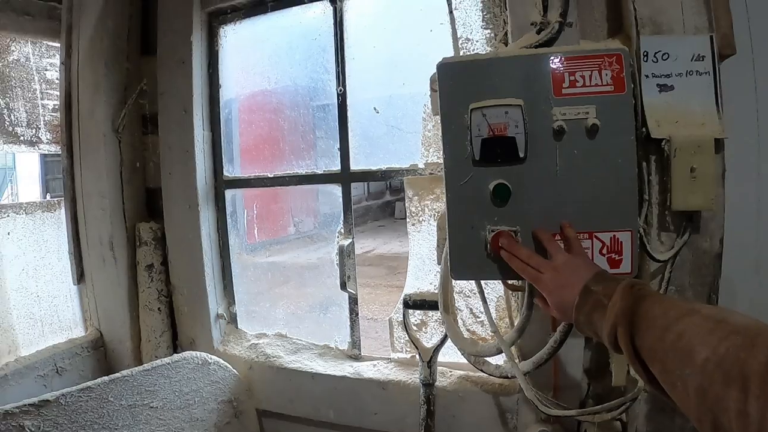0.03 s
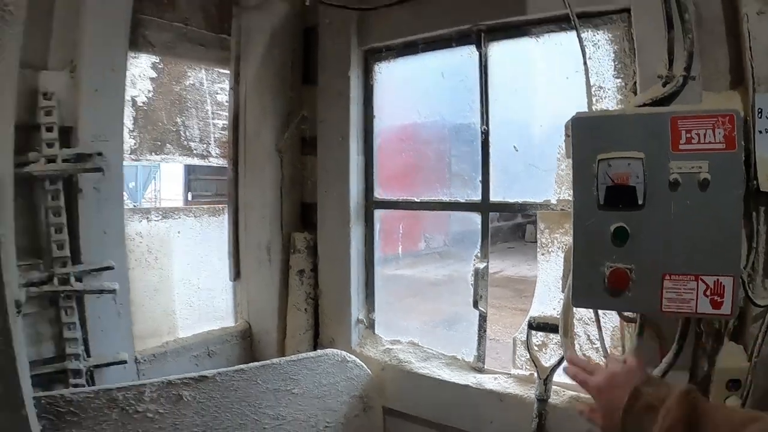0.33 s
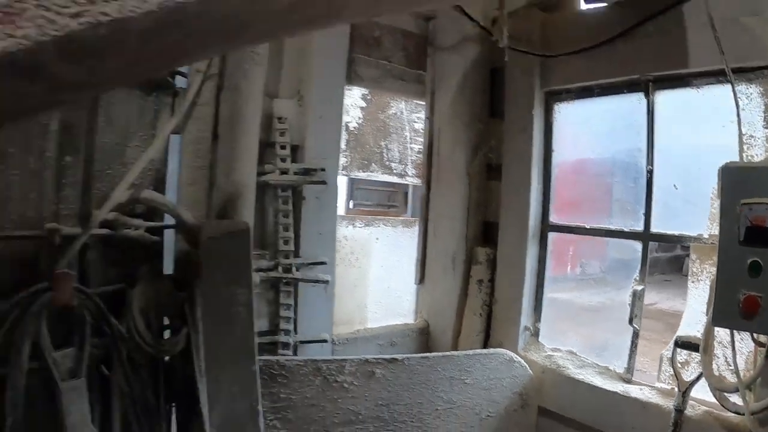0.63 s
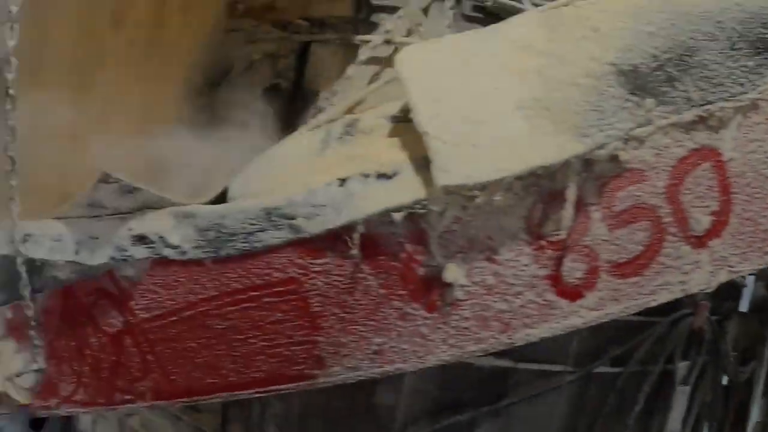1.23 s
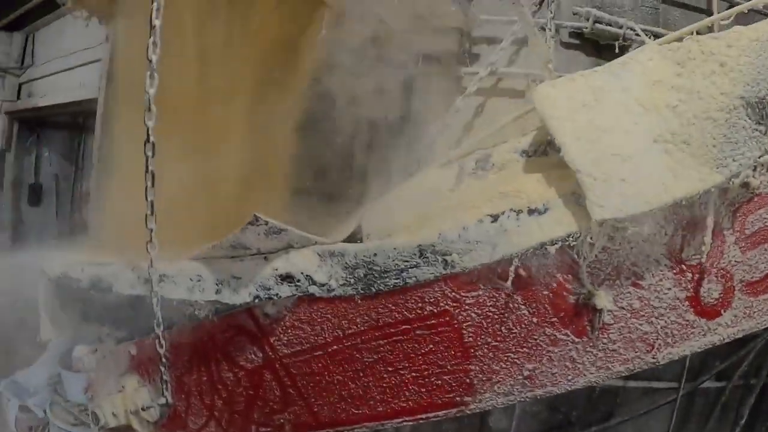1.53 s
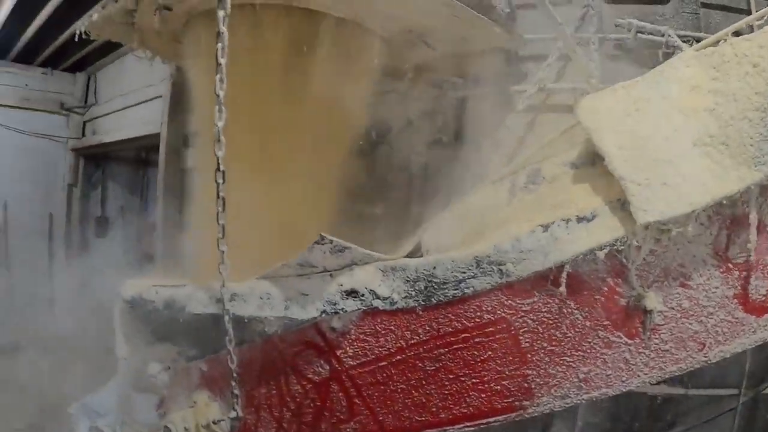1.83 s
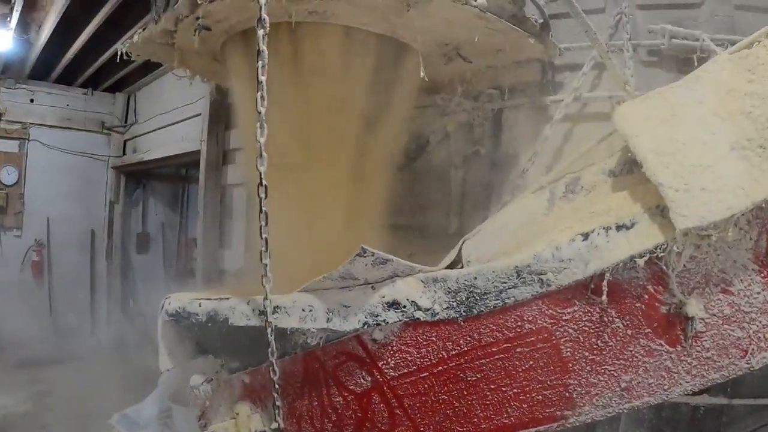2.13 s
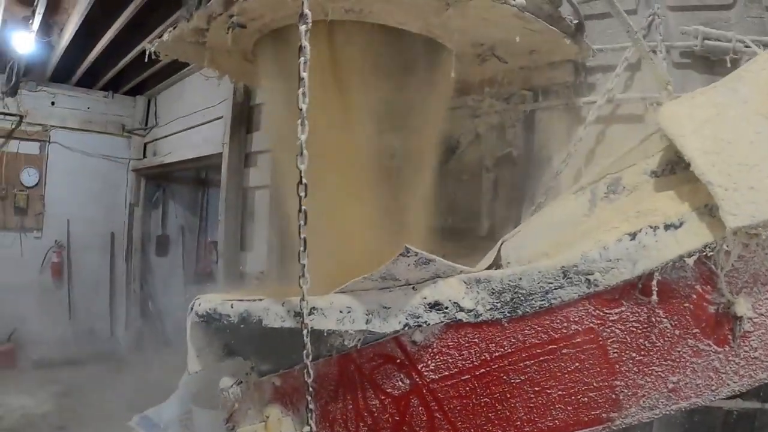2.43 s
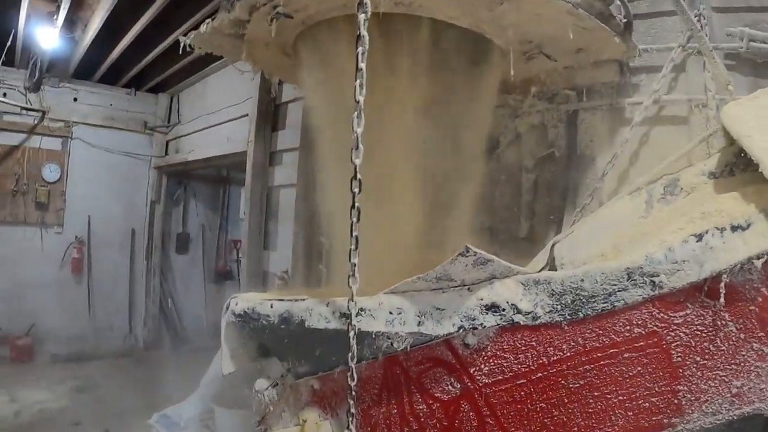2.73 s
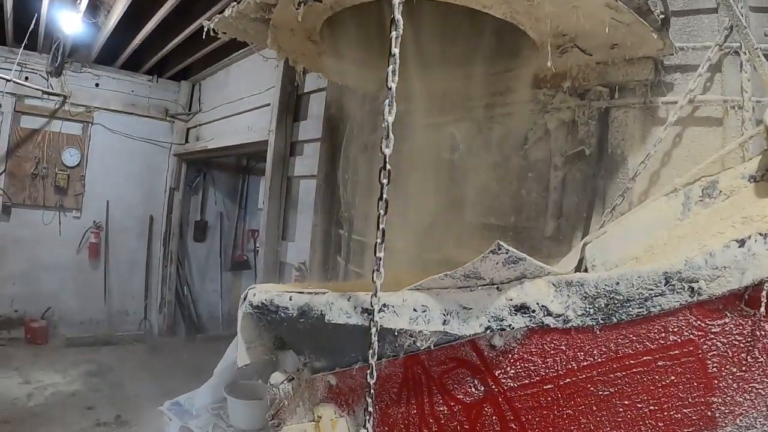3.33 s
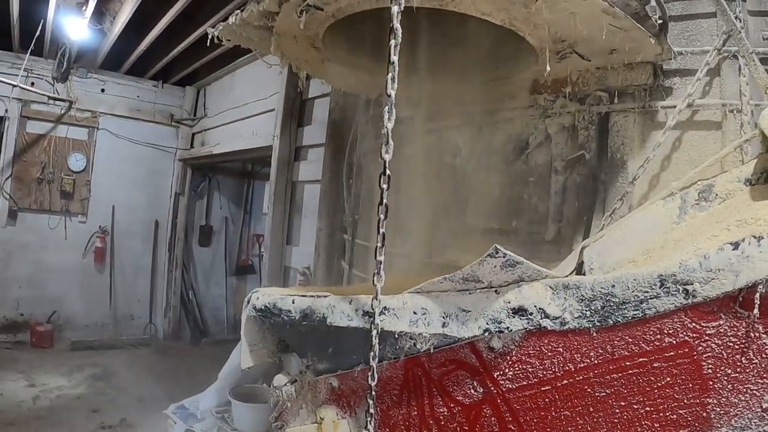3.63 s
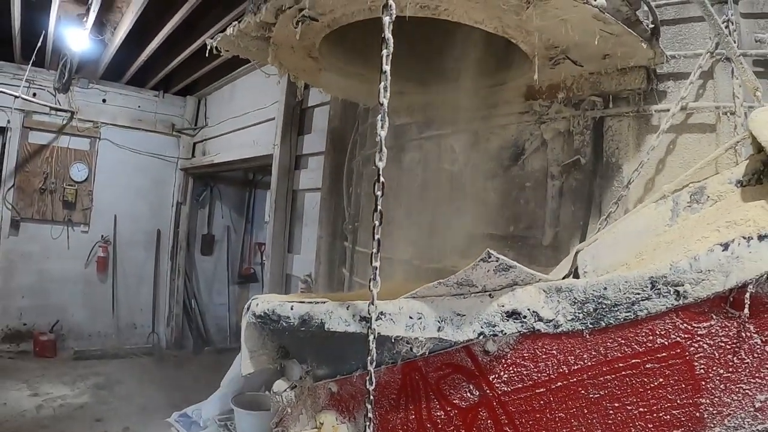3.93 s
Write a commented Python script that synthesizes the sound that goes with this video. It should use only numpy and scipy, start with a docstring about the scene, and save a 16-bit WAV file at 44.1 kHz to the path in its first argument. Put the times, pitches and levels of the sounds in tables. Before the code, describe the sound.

Feed roars down a chute into a mixer in a farm building, with thudding clumps and a hissing pour. A button clicks early. As the microphone turns, close patter and clacks come forward, then the stream thins.

```python
"""A booming roar comes first: feed from a silo unloader tumbles down a chute into a mixer in a farm building.
Clumps thud in the chute, hard bits clack on its wall, and the pouring stream hisses and patters,
thinning out at the end. Early on a button clicks at the control box; the microphone turns
from the box to the open stream on its right, and close ticks and fine spray come forward."""
import sys
import numpy as np
from scipy import signal
from scipy.fft import rfft, irfft, next_fast_len
from scipy.io import wavfile
from scipy.ndimage import map_coordinates

SR = 44100
rng = np.random.default_rng(int(sys.argv[2]) if len(sys.argv) > 2 else 0)


def to_wav(s):
    """Save 16-bit WAV."""
    ch = np.atleast_2d(s).T  # columns
    pcm = np.round(np.clip(ch, -1, 1) * 32767)  # PCM
    wavfile.write(sys.argv[1], SR, pcm.astype(np.int16))


N = 176400

# Fader rides for the chute's roar (t/s, level/dB)
RUMBLE_FADER = [(0.0, -25.5), (1.99, -26), (4.0, -24)]
BOOM_FADER = [(0.0, -19.5), (0.36, -24), (0.52, -18.5), (0.58, -27), (0.7, -25), (0.83, -20.5), (0.93, -27),
              (1.1, -22.5), (2.42, -22.5), (3.25, -25.5), (3.62, -22.5), (4.0, -25.5)]
RUSH_FADER = [(0.0, -30), (0.88, -31.5), (1.5, -30), (2.0, -31), (2.58, -33.5), (3.48, -33), (3.68, -29.5),
              (4.0, -31.5)]
DRONE_FADER = [(0, -27), (1.0, -30.5), (1.8, -24), (2.3, -30), (2.62, -23), (3.3, -24), (4, -21.5)]  # the chute's lowest air resonance
CORNER_FADER = [(0, -28), (.5, -27), (.95, -32.5), (1.4, -39)]  # a boomy spot of the room beside the control box
# EQ of the roar: deep rumble, low boom, midrange rush (f/Hz, level/dB)
RUMBLE_EQ = [(10, -24), (24, -7.5), (33, 1), (44, -4), (56, -6.5), (72, -4.5), (88, -6), (130, 3.5),
             (300, -85)]
BOOM_EQ = [(60, -50), (95, -7.5), (108, 0.5), (140, -8.5), (162, -1), (190, -3.5), (235, -0.5), (300, -6),
           (380, -11.5), (520, -17.5), (1000, -51), (2000, -100)]
RUSH_EQ = [(150, -36.5), (330, 1.5), (440, 3), (570, 1), (740, 0.5), (900, -3.5), (1150, -9.5),
           (1600, -15.5), (2200, -20.5), (4000, -33), (9000, -81)]

# Fader rides for the stream (t/s, level/dB)
POUR_FADER = [(0.0, -39.5), (0.42, -38.5), (0.9, -41.5), (1.12, -44), (1.29, -42), (2.02, -39.5),
              (2.36, -39), (2.61, -44.5), (3.1, -42.5), (3.3, -47), (3.95, -53)]
WASH_FADER = [(0, -44), (.45, -48.5), (.7, -54.5), (1.0, -66.5)]  # patter off the walls, blurred to a smooth hiss
PATTER_FADER = [(1.03, -65.5), (1.075, -43), (1.35, -46.5), (1.65, -46), (2.2, -46), (2.65, -49),
                (3.1, -55), (3.5, -52.5), (4, -65)]  # opens up once the mixer's side no longer screens it
SPRAY_FADER = [(0, -63), (.5, -79), (1.03, -83), (1.08, -60), (1.3, -54.5), (1.6, -49.5), (2.15, -47),
               (2.6, -50.5), (3.0, -51.5), (3.5, -56.5), (4, -62.5)]  # fine spray, heard only in sight of the stream
GRIT_FADER = [(1.05, -62), (1.3, -51.5), (1.9, -40.5), (2.35, -47), (3.0, -49)]  # coarse grit in the thick of the stream
# EQ of the stream: broad pour, crisp patter, airy spray (f/Hz, level/dB)
POUR_EQ = [(500, -7.5), (1300, 2), (2100, 0), (2650, 0), (3200, -1.5), (3900, -1), (5000, -9),
           (6300, -16.5), (7500, -23.5), (8600, -31.5), (10500, -45.5), (15000, -54.5)]
PATTER_EQ = [(2000, -31.5), (3600, 2.5), (4700, 1.5), (6200, 1), (7600, -9), (8600, -24), (10000, -27),
             (14000, -43.5)]
SPRAY_EQ = [(2000, -27), (4500, 3.5), (6200, -5), (7600, -0.5), (8800, -6.5), (10700, -14.5),
            (12300, -13.5), (14000, -20.5), (15700, -29.5)]

# Cues for clumps hitting the chute (t/s, level/dB, brightness/dB, body t60/s)
THUD_CUES = [(0.078, -16, -16, 0.1), (.48, -14, -5.5, 0.084), (.728, -22, 1, 0.28),
             (1.093, -17.5, -12, 0.086), (1.826, -22.5, 0.5, 0.035), (2.11, -24, 8, 0.21),
             (2.17, -22, 2.5, 0.1), (2.512, -20.5, -2, 0.28), (2.739, -25.5, 3.5, 0.66),
             (2.785, -22.5, -19, 0.53), (3.141, -21.5, -1.5, 0.51), (3.21, -23, -7, 0.42),
             (3.44, -23.5, -3, 0.5), (3.828, -21, 3, 0.26), (3.912, -26.5, 2.5, 0.25)]
# EQ of a clump's dull body and of the crunch on top (f/Hz, level/dB)
THUD_EQ = [(120, -14), (300, 0.5), (500, -3), (800, -2), (1100, -13), (1700, -32.5), (4000, -70),
           (10000, -94.5)]
CRUNCH_EQ = [(500, -27), (1000, 1), (1550, 4), (2300, -5.5), (3200, -15.5), (6000, -24), (12000, -76)]
# Cues for heavy lumps that make the whole chute boom (t/s, f/Hz, level/dB)
LUMP_CUES = [(0.034, 215.4, -5), (0.081, 197, -4.5), (0.438, 241, -9), (.492, 223.6, -7),
             (0.62, 179.5, -9.5), (.733, 214.4, -3), (.78, 202.6, -0.5), (1.022, 289, -10.5),
             (2.44, 228.3, -6.5), (2.48, 226, -3.5), (2.52, 224.5, -5.5)]

# Cues for hard bits striking the chute wall (t/s, level/dB, emphasis f/Hz)
CLACK_CUES = [(1.36, -22.5, 2580), (1.529, -26, 2720), (1.827, -17.5, 2600), (1.8315, -22.5, 2900),
              (1.98, -24, 4700), (2.038, -23, 4620), (2.111, -22, 2000), (2.1708, -17.5, 3050),
              (2.174, -21, 2950), (2.487, -18, 4050), (2.862, -19.5, 2680), (3.209, -26, 2590),
              (3.238, -26.5, 2540), (3.615, -27, 3200), (3.679, -25.5, 2610), (3.7895, -28, 3300),
              (3.831, -26.5, 2200), (3.9108, -19.5, 3640), (3.916, -19.5, 2980)]
# The wall's ringing modes (f/Hz, width/Hz, level/dB)
WALL_MODES = [(1680, 500, -2), (2646, 115, 3.5), (2930, 300, 3), (3800, 850, 7), (4560, 450, -5)]
# Cues for kernels landing close by (t/s, level/dB, share of spray colour/0-1)
TICK_CUES = [(1.0405, -33, 0.3), (1.073, -25.5, 0.1), (1.095, -28.5, 0), (1.122, -25, 0.05),
             (1.1362, -24, 0.05), (1.305, -23, 0), (1.475, -19.5, 0.02), (2.083, -24.5, .3),
             (2.459, -30.5, 1), (2.564, -26, 0.6), (2.975, -24.5, 0.2), (3.284, -24, 0.8),
             (3.646, -29.5, 0.7), (3.974, -27, 0.4)]
# Fader ride for stray kernels around the stream (t/s, level/dB)
STRAY_FADER = [(1.03, -68), (1.3, -51), (2.3, -48), (3.3, -46), (4, -56.5)]

# Cues for the button springing back (t/s, level/dB)
BUTTON_CUES = [(0.1896, -24.5), (0.2, -34)]
# EQ of its snap (f/Hz, level/dB)
BUTTON_EQ = [(500, -19), (1200, 9.5), (2200, 2.5), (3100, -3.5), (4300, 3.5), (5500, -7), (8000, -15.5),
             (9300, -16), (11000, -30.5), (15000, -37.5)]

# The microphone's turn (t/s, share of full shading/0-1)
MIC_TURN = [(0, 0.19), (.6, 0.33), (1.0, 0.45), (1.5, 0.61), (2.2, 0.73), (2.8, 0.83), (3.3, 0.95),
            (4, 0.94)]
# Full shading of its left port (f/Hz, left minus right level/dB)
PORT_SHADE = [(40, 4.5), (120, -2), (250, -4.5), (500, -8.5), (1000, -11), (2000, -11), (4000, -7.5),
              (7000, -10), (12000, -17)]
# Stereo image: narrow bass, wide top (f/Hz, left-right correlation/0-1)
STEREO_LIKENESS = [(100, 0.99), (1500, 0.98), (4000, 1), (8000, 0.85), (12000, .45)]

TOP_HZ = 15700


def chute():
    """The main roar: tumbling feed keeps the chute rumbling, droning, booming and rushing."""
    rumble = fader(RUMBLE_FADER) * noise(eq(RUMBLE_EQ))
    air_mode = noise(resonance(centre_hz=118.4, width_hz=20))
    drone = fader(DRONE_FADER) * wander(air_mode, share=0.0606, per_s=7)
    corner = fader(CORNER_FADER) * noise(resonance(centre_hz=186.5, width_hz=46))
    surge = wobble(23.88)  # boom and rush swell together
    boom = fader(BOOM_FADER, 2.0 + 0.8 * surge) * hail(eq(BOOM_EQ), per_s=1500, scatter_db=0.5)
    rush_trim_db = 1.5 + 0.33 * surge + 0.22 * wobble(42)
    rush = fader(RUSH_FADER, rush_trim_db) * hail(eq(RUSH_EQ), per_s=4000, scatter_db=1)
    return rumble + drone + corner + boom + rush


def stream():
    """Countless particles pour into the mixer; coarse ones patter and fine spray crackles on top."""
    flow_db = 1.8 * wobble(21.62)
    pour = fader(POUR_FADER, 0.48 + flow_db) * hail(eq(POUR_EQ), per_s=12000, scatter_db=3.5)
    wash = fader(WASH_FADER) * noise(eq(PATTER_EQ))
    patter_gain = fader(PATTER_FADER, flow_db + 1.5 * wobble(70))
    patter = patter_gain * hail(eq(PATTER_EQ), per_s=9000, scatter_db=9.5)
    spray_gain = fader(SPRAY_FADER, flow_db + 0.44 * wobble(55))
    spray = spray_gain * hail(eq(SPRAY_EQ), per_s=7000, scatter_db=4.0)
    grit = fader(GRIT_FADER) * hail(eq(POUR_EQ), per_s=450, scatter_db=2.5)
    return pour + grit + wash + patter + spray


def clumps():
    """Soft clumps thud and crumble; the heaviest lumps set the chute booming."""
    out, t = np.zeros((2, N)), np.arange(SR // 2) / SR
    for s, db, bright_db, t60_s in THUD_CUES:
        add(out, s, amp(db) * burst(eq(THUD_EQ), attack_s=0.0046, t60_s=t60_s))
        add(out, s, amp(db + bright_db - 8) * burst(eq(CRUNCH_EQ), attack_s=0.0027, t60_s=0.14))
    lump_attack_s, lump_t60_s = 0.0089, 0.12
    for s, hz, db in LUMP_CUES:
        swell = (1 - np.exp(-t / lump_attack_s)) * amp(db - 60 * t / lump_t60_s)
        phase_drift = 0.5 * wobble(60)[:len(t)]
        add(out, s, swell * np.sin(2 * np.pi * hz * t + phase_drift))
    return out


def clack(emphasis_hz):
    """The wall's modes ring from one hard blow, a little differently at every spot; peak 1."""
    detune, scatter_db, spread_oct, contact_s = 0.025, 2.5, 0.28, 0.00035
    t, ring = np.arange(SR // 20) / SR, 0
    for hz, width_hz, db in WALL_MODES:
        mistune, size = rng.standard_normal(2)
        emphasis = 1 / (1 + (np.log2(hz / emphasis_hz) / spread_oct) ** 2)
        strength = amp(db + scatter_db * size) * np.sqrt(width_hz) * emphasis
        decay = np.exp(-np.pi * width_hz * t)
        ring += strength * decay * np.sin(2 * np.pi * hz * (1 + detune * mistune) * t)
    ring *= 1 - np.exp(-(t / contact_s) ** 2)
    return ring / np.abs(ring).max()


def tick(spray_share):
    """A kernel lands close by: a sharp transient with a tiny rattling tail."""
    def colour(hz):
        return spray_share * eq(SPRAY_EQ)(hz) + (1 - spray_share) * eq(PATTER_EQ)(hz)
    rattle = burst(colour, attack_s=0.00024, t60_s=0.017, size=1024)
    return click(colour) + amp(-13) * rattle


def kernels():
    """The hard accents: bits ring the wall briefly; near ones only tick."""
    out = np.zeros((2, N))
    for s, db, emphasis_hz in CLACK_CUES:
        add(out, s, amp(db) * clack(emphasis_hz))
    for s, db, spray_share in TICK_CUES:
        add(out, s, amp(db) * tick(spray_share))
    return out


def button():
    """The control box's button springs back with a double click."""
    out = np.zeros((2, N))
    for s, db in BUTTON_CUES:
        add(out, s, amp(db) * burst(eq(BUTTON_EQ), attack_s=0.0007, t60_s=0.06))
    return out


def strays():
    """Loose kernels land at random, ticking nearby or, louder, tapping the chute wall."""
    start_s, per_s, count = 1.05, 32, 256
    scatter_db, wall_boost_db = 4.5, 9
    out = np.zeros((2, N))
    times = start_s + np.cumsum(rng.exponential(1, count)) / per_s
    for s, size, on_wall in zip(times, rng.standard_normal(count), rng.random(count) < 0.5):
        db = at_time(STRAY_FADER, s) + scatter_db * min(size, 2) + wall_boost_db * on_wall
        colour = wall_colour if on_wall else eq(SPRAY_EQ)
        add(out, s, amp(db) * burst(colour, attack_s=0.00061, t60_s=0.009, size=2048))
    return out


def wall_colour(hz):
    """The chute wall as an EQ, one peak for each mode."""
    return sum(amp(db) / (1 + (2 * (hz - centre) / width) ** 2) for centre, width, db in WALL_MODES)


def room(x):
    """The building's short reverb, wet only."""
    tail = burst(lambda hz: hz < TOP_HZ, attack_s=0.0032, t60_s=0.17)
    return signal.fftconvolve(x, tail / np.linalg.norm(tail[0]), axes=1)[:, :N]


def mic_turn(x):
    """The turn shades the microphone's left port, so mids and highs lean to the right."""
    hz, t, spectra = signal.stft(x, SR, nperseg=1024)
    left_over_right = amp(at_freq(PORT_SHADE, hz)[:, None] * at_time(MIC_TURN, t))
    right = 2 / (1 + left_over_right)
    left = left_over_right * right
    return signal.istft(spectra * np.array([left, right]), SR, nperseg=1024)[1][:, :N]


def amp(db):
    """Decibels to gain."""
    return 10 ** (np.asarray(db) / 20)


def at_time(points, s):
    """Read (t/s, value) points at time s."""
    return np.interp(s, *np.transpose(points))


def at_freq(points, hz):
    """Read (f/Hz, value) points on a log axis."""
    freqs, values = np.transpose(points)
    return np.interp(np.log(hz + 1), np.log(freqs + 1), values)


def fader(points, trim_db=0):
    """A fader ride plus a trim, as one gain per sample."""
    return amp(at_time(points, np.arange(N) / SR) + trim_db)


def eq(points):
    """An EQ curve as a colour: gain against frequency."""
    return lambda hz: amp(at_freq(points, hz))


def resonance(centre_hz, width_hz):
    """The colour of a narrow air resonance."""
    return lambda hz: 1 / (1 + ((hz - centre_hz) / width_hz) ** 2) ** 2


def wobble(per_s):
    """Smooth random modulation with per_s knots a second."""
    return map_coordinates(rng.standard_normal(4096), [np.arange(N) * per_s / SR], mode="wrap")


def wander(x, share, per_s):
    """Varispeed: the pitch of x drifts at random by about the given share."""
    position = np.cumsum(1 + share * wobble(per_s)) % N
    return np.array([np.interp(position, np.arange(N), side) for side in x])


def coloured(pair, colour):
    """Shape two unrelated signals into a stereo pair of rms 1, near mono in the bass."""
    hz = np.fft.rfftfreq(pair.shape[1], 1 / SR)
    spread = np.arccos(np.clip(at_freq(STEREO_LIKENESS, hz), -1, 1)) / 2
    mid, side = irfft(rfft(pair) * colour(hz) * [np.cos(spread), np.sin(spread)], pair.shape[1])
    stereo = np.array([mid + side, mid - side])
    return stereo / np.sqrt(np.mean(stereo ** 2) + 1e-20)


def noise(colour, size=N):
    """A smooth bed of coloured stereo noise."""
    return coloured(rng.standard_normal((2, size)), colour)


def hail(colour, per_s, scatter_db):
    """A grainy bed of random impacts, scattered in size and alike in colour."""
    sizes = rng.standard_normal((2, N)) * amp(scatter_db * np.clip(rng.standard_normal(N), -2, 2))
    hits = rng.random(N) < per_s / SR
    return coloured(sizes * hits, colour)


def burst(colour, attack_s, t60_s, size=SR // 2):
    """A noise hit that rises smoothly and dies away."""
    t = np.arange(size) / SR
    attack = (1 - np.exp(-2 * t / attack_s)) ** 2
    return noise(colour, size) * attack * amp(-60 * t / t60_s)


def click(colour, size=1024):
    """One sharp impact, minimum phase so that its energy comes up front; peak 1."""
    cepstrum = irfft(np.log(colour(np.fft.rfftfreq(size, 1 / SR)) + 1e-9))
    pulse = irfft(np.exp(rfft(2 * cepstrum[:size // 2], size) - cepstrum[0]))
    return pulse / np.abs(pulse).max()


def add(track, s, sound):
    """Mix a sound into the track at time s."""
    part = track[:, max(round(s * SR), 0):][:, :sound.shape[-1]]
    part += sound[..., :part.shape[1]]


def scene():
    """The mix at the turning microphone; only the sharp hits feed the reverb."""
    sharp = kernels() + strays() + button()
    return mic_turn(chute() + stream() + clumps() + sharp + amp(-14.5) * room(sharp))


def record(dry):
    """The master: tiny fades at both ends and a brick-wall cut at TOP_HZ."""
    padded = next_fast_len(N + SR // 2)
    eased = dry * signal.windows.tukey(N, 0.001)
    passband = np.fft.rfftfreq(padded, 1 / SR) < TOP_HZ
    return irfft(rfft(eased, padded) * passband, padded)[:, :N]


dry = scene()
out = record(dry)
to_wav(out)
```